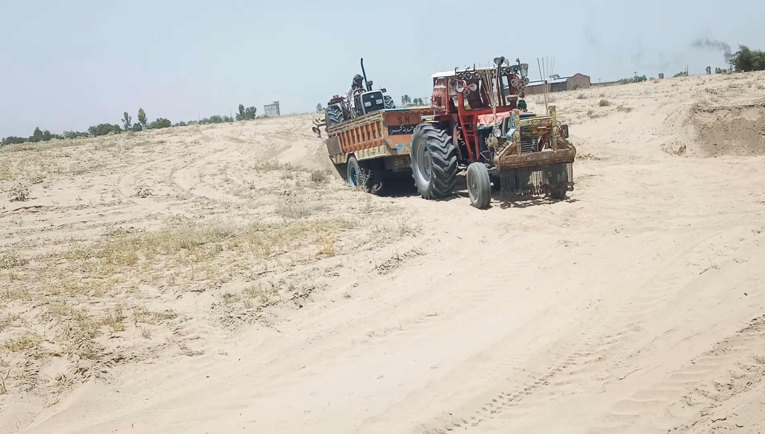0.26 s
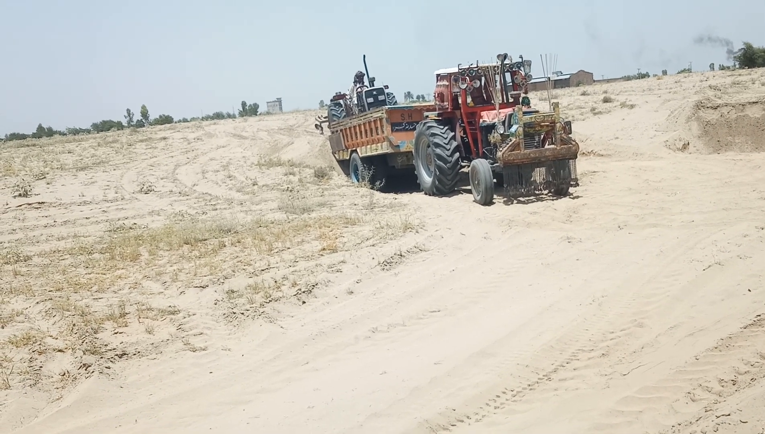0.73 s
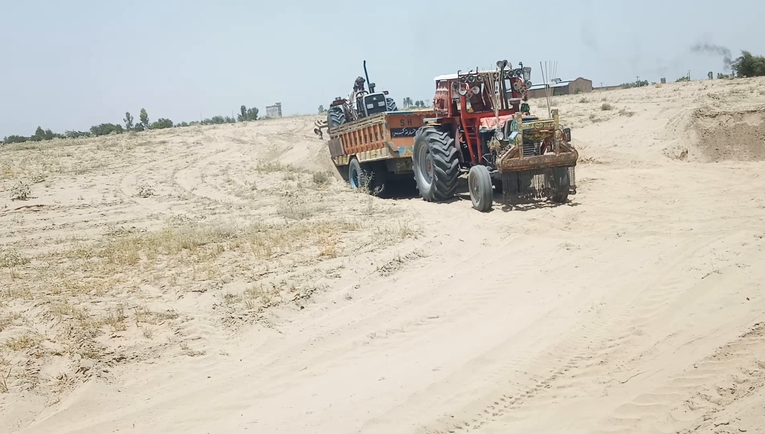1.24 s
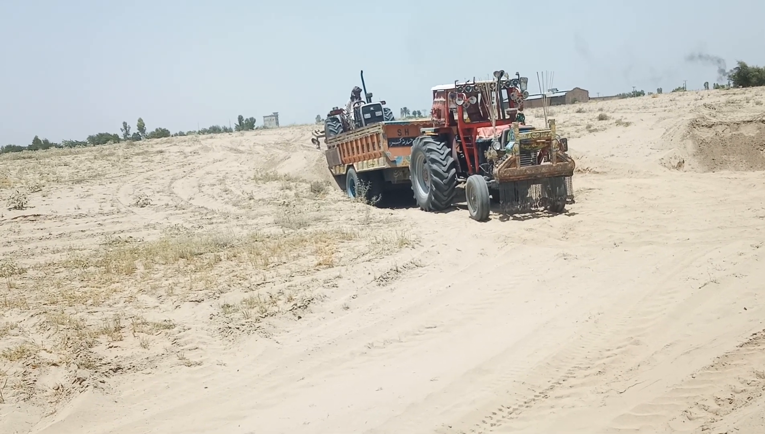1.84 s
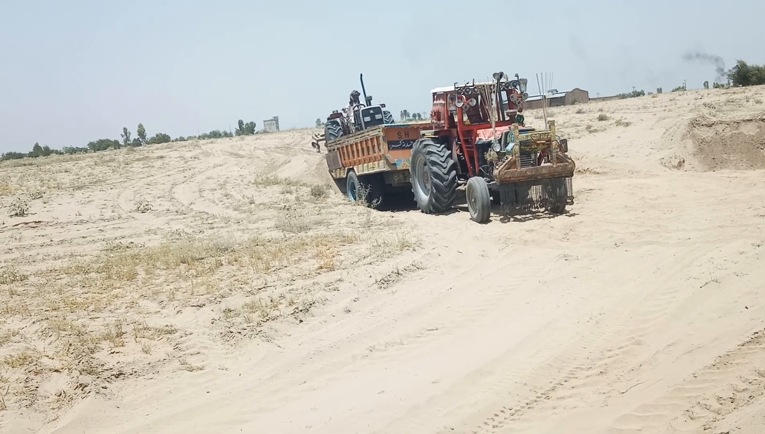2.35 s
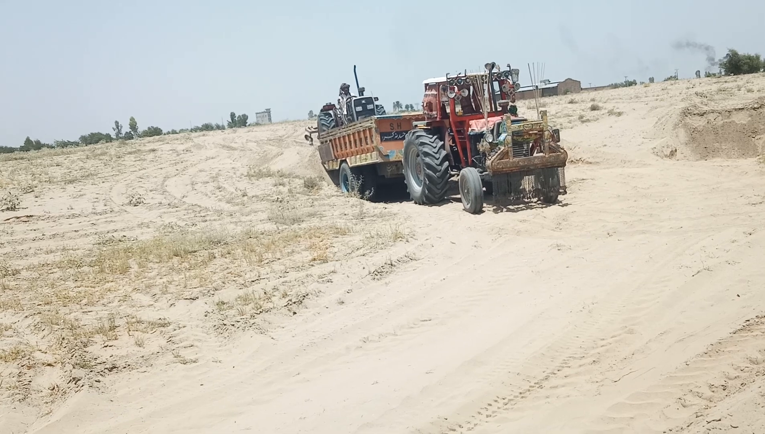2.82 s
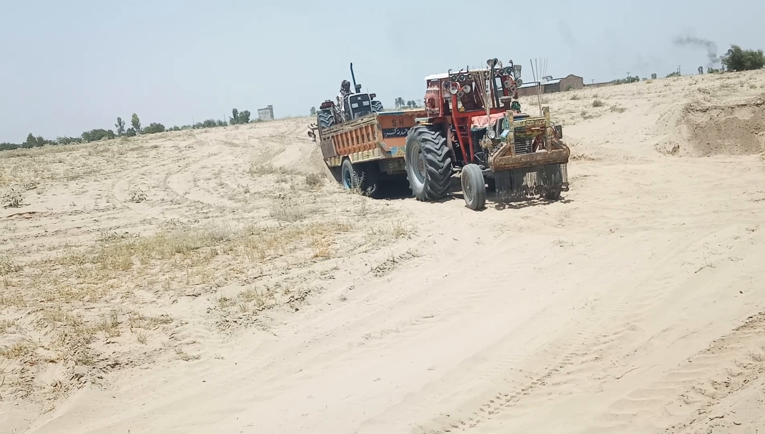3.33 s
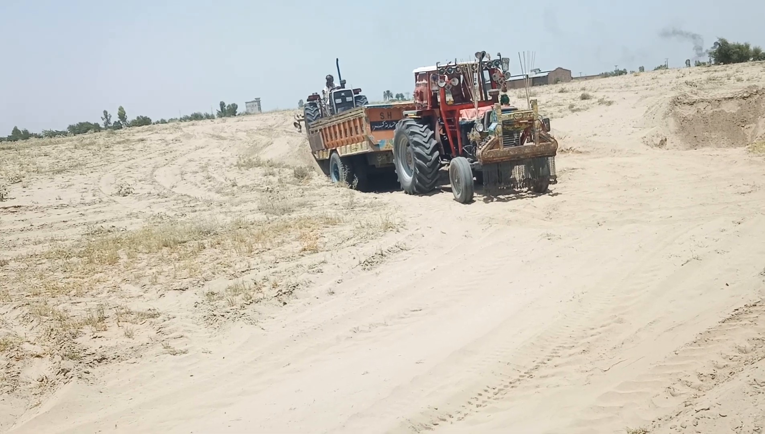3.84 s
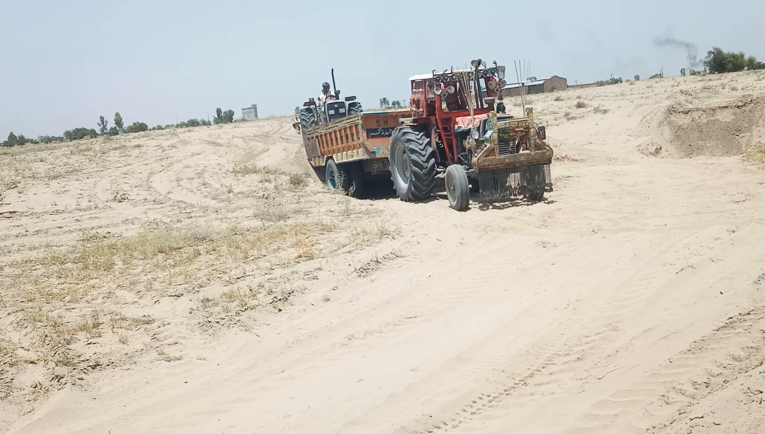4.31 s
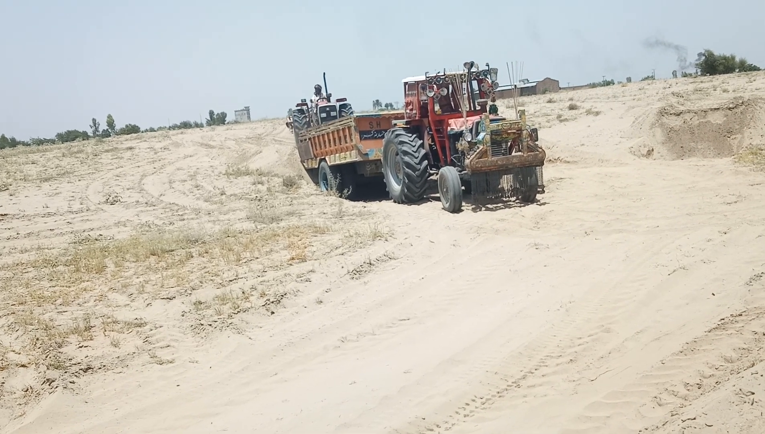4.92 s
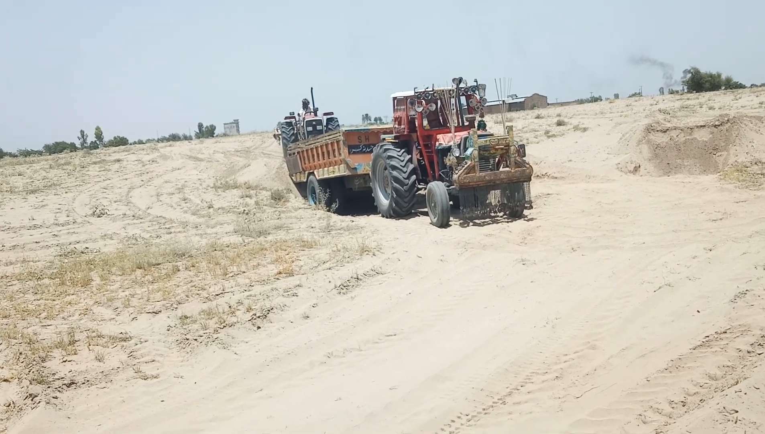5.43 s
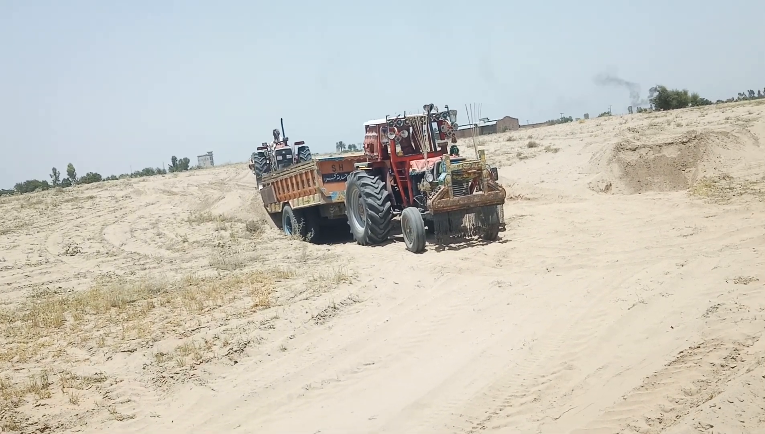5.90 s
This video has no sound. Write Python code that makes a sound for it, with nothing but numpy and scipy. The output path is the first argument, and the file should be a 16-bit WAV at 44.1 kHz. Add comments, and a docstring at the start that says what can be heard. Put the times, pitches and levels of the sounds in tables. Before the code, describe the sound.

Wind rumbles and flaps over an exposed microphone while a tractor engine knocks and chuffs across open ground. Its pulse sags twice under load, with crisp spitting exhaust and brief high chirps, and a single dull knock sounds close by. As the wind fades, the firing quickens into a steady, lighter, slightly uneven diesel clatter that continues to the end.

```python
"""In an open field a diesel tractor drags a loaded trolley through soft sand.
The engine bogs down, works hardest around its slowest moments, then gathers speed. Each firing drives harmonics
of the firing rate (boom) and bursts of filtered noise (knocks, chuffs, spit); short falling tones make chirps.
Wind is shaped noise: a breeze throughout, with gusts and two rushes in little more than the first three seconds.
One dull knock and a faint steady noise complete the scene."""
import sys
import numpy as np
from scipy import signal
from scipy.fft import rfft, irfft, next_fast_len
from scipy.io import wavfile
from scipy.ndimage import uniform_filter1d, map_coordinates

SR = 44100
rng = np.random.default_rng(int(sys.argv[2]) if len(sys.argv) > 2 else 0)


def generate_wav(sig):
    """Save sig (samples, or channels by samples) to the path in sys.argv[1] as 16-bit PCM at SR."""
    pcm = np.round(np.clip(np.atleast_2d(sig).T, -1, 1) * 32767).astype(np.int16)
    wavfile.write(sys.argv[1], SR, pcm)


N = 271656
T = np.arange(N) / SR

# how hard the engine labours: (time [s], effort [0-1])
EFFORT = [(0, 0.3), (.88, 0.42), (1.3, .08), (1.78, 0.4), (1.82, .88), (1.92, 0.56), (1.99, 0.2),
          (2.6, 0.52), (2.97, .5), (3.04, 1), (3.3, 0.81), (3.51, 0.74), (3.72, 0.56), (4.1, 0.31),
          (6.16, 0.31)]


def gain_of(db):
    """Turns decibels into a plain multiplier."""
    return 10 ** (np.asarray(db) / 20)


def evened(x):
    """Scales a signal to an average strength (rms) of 1."""
    return x / np.sqrt(np.mean(x ** 2) + 1e-20)


def curve(rows):
    """Joins (time, value) points by straight lines, one value per sample."""
    return np.interp(T, *np.transpose(rows))


def noise(points):
    """Random noise at rms 1 whose strength at each pitch follows the points."""
    hz, db = np.transpose(points)
    size = next_fast_len(N + 4096)
    f = np.fft.rfftfreq(size, 1 / SR)
    level_db = np.interp(np.log(f + 1), np.log(hz), db)
    spectrum = rfft(rng.standard_normal(N), size) * gain_of(level_db)
    return evened(irfft(spectrum, size)[:N])


def drift(rate):
    """Smooth random wandering at rms 1, with about `rate` new values a second."""
    knots = rng.standard_normal(4096)
    coarse_time = T[::32]
    wander = map_coordinates(knots, [coarse_time * rate], mode="wrap")
    return evened(np.interp(T, coarse_time, wander))


def add(mix, s, sound):
    """Lays a sound into the mix, starting s seconds in."""
    part = mix[max(round(s * SR), 0):][:len(sound)]
    part += sound[:len(part)]


def envelope(rows, attack, sag_db, release):
    """Gain of events (start, length, dB) that rise, sag steadily and die away after their length."""
    power = np.full(N, 1e-12)
    for s, length, db in rows:
        t = np.arange(0, length + 8 * release, 1 / SR)
        shape = np.minimum(t / attack, 1) * np.exp(-np.maximum(t - length, 0) / release)
        add(power, s, (gain_of(db + sag_db * t) * shape) ** 2)
    return np.sqrt(power)


def floor_noise():
    """A faint, steady noise under everything."""
    # colour of the noise: (frequency [Hz], relative level per hertz [dB])
    floor_colour = [(20, 1.5), (5000, 6.5), (7000, 2.5), (9000, -2), (15500, -3.5)]
    return gain_of(-73.5) * noise(floor_colour)


def breeze():
    """Soft low wind noise that swells and fades, with a random waver."""
    # strength of the breeze before its waver: (time [s], level [dB])
    breeze_level = [(0, -43), (.22, -44.5), (.45, -39), (1.9, -29), (2.8, -36), (3.3, -41), (3.7, -53.5),
                    (6.16, -62)]
    # colour of the breeze: (frequency [Hz], relative level per hertz [dB])
    soft_colour = [(15, -27), (35, -28.5), (55, -18), (80, 4), (125, 3.5), (200, -1), (320, -11.5),
                   (550, -27), (1200, -63), (4000, -110)]
    return gain_of(curve(breeze_level) + 3 * drift(25)) * noise(soft_colour)


def eddies(points, steady):
    """Turbulent noise whose slow swells are partly evened out, by the share `steady`."""
    x = noise(points)
    local_power = abs(uniform_filter1d(x ** 2, size=900)) + 1e-6  # averaged over about 20 ms
    return evened(x / local_power ** (steady / 2))


def gusts(corner_hz=560, full_db=-21, brighten=0.78, flutter_db=1.5, lumps_db=1.24):
    """Lumpy gusts buffet the microphone: the harder the gust, the higher its rumble reaches."""
    # gusts before their lumps: (start [s], length [s], deep level [dB], upper level relative to deep [dB])
    gust_rows = [(0, 0.023, -28.5, -15), (0.769, .04, -25, -6), (0.813, 0.097, -19, -7.5),
                 (0.916, 0.11, -16.5, -2), (1.09, 0.033, -16, -0.5), (1.142, 0.074, -19.5, 0),
                 (1.257, 0.072, -23.5, -8.5), (1.353, 0.054, -17.5, -6), (1.42, 0.051, -22.5, 3.5),
                 (1.516, .045, -17, 2), (1.571, 0.057, -18.5, -4), (1.632, 0.047, -17.5, 1.5),
                 (1.732, 0.028, -18.5, -4), (1.778, 0.065, -17.5, 1.5), (1.847, 0.16, -22.5, 3),
                 (2.013, 0.064, -26, -10), (2.09, 0.023, -18.5, -3.5), (2.221, .12, -20.5, -11),
                 (2.49, 0.067, -22, -7.5), (2.584, 0.036, -25, -13.5), (2.693, .11, -25, -8.5),
                 (2.897, .025, -33, -13), (3.021, .02, -30, -23), (3.115, 0.031, -32.5, -8),
                 (3.188, 0.031, -26.5, -10)]
    # colour of the deep part: (frequency [Hz], relative level per hertz [dB])
    deep_colour = [(15, -35.5), (30, -32), (50, -42.5), (75, -6.5), (105, 2.5), (210, 1), (280, -8),
                   (400, -20.5), (900, -67), (3000, -115)]
    # colour of the upper part: (frequency [Hz], relative level per hertz [dB])
    upper_colour = [(100, -33), (220, -0.5), (290, 2), (440, -4), (550, -9.5), (700, -17), (1000, -30.5),
                    (1400, -42), (3000, -67), (6500, -100)]
    attack_s, sag_db_per_s, release_s = .011, -22.5, 0.015
    shape = attack_s, sag_db_per_s, release_s
    deep_rows = [(s, length, db) for s, length, db, _ in gust_rows]
    upper_rows = [(s, length, db + upper_db) for s, length, db, upper_db in gust_rows]
    lumps = gain_of(lumps_db * drift(60))
    deep = lumps * envelope(deep_rows, *shape)
    upper = lumps * envelope(upper_rows, *shape)
    turbulence = eddies(upper_colour, steady=0.45) * gain_of(flutter_db * drift(130))
    dull = signal.sosfiltfilt(signal.butter(2, corner_hz, fs=SR, output="sos"), turbulence)
    # a stronger gust keeps more of the sound above the corner
    strength_db = 20 * np.log10(upper) - full_db
    reach = gain_of(brighten * np.clip(strength_db, -24, 4))
    return deep * eddies(deep_colour, steady=0.093) + upper * (dull + reach * (turbulence - dull))


def rushes():
    """Air rushes straight across the microphone, as short bursts of turbulent noise."""
    # rushes of air: (start [s], length [s], level [dB])
    rush_rows = [(.296, 0.032, -31), (.348, 0.049, -23)]
    # colour of the rushes: (frequency [Hz], relative level per hertz [dB])
    rush_colour = [(40, -25), (110, 8), (280, 10.5), (500, 0.5), (800, 3.5), (1050, -6), (1300, -3.5),
                   (2000, -11), (2600, -13.5), (3500, -5.5), (4200, -20), (4800, -49), (9000, -73)]
    attack_s, sag_db_per_s, release_s = 0.013, -4, 0.057
    return envelope(rush_rows, attack_s, sag_db_per_s, release_s) * eddies(rush_colour, steady=0.2)


def knocks():
    """A dull blow with no ring: noise that rises at once and dies within milliseconds."""
    # short knock close by: (time [s], level [dB], decay time [s])
    knock_rows = [(2.905, -30.5, 0.0025)]
    # colour of the knock: (frequency [Hz], relative level per hertz [dB])
    knock_colour = [(80, -8), (250, 10), (750, -2), (1200, -24), (4200, -12), (4900, -58)]
    out, t = np.zeros(N), np.arange(2000) / SR
    for s, db, decay in knock_rows:
        shape = np.e * t / decay * np.exp(-t / decay)  # peaks at 1
        add(out, s, gain_of(db) * evened(noise(knock_colour)[:len(t)]) * shape)
    return out


def firings(scatter_db=0.36, start_phase=-.53):
    """Engine speed adds up to a running count of firings; also the time [s] and strength [dB] of each."""
    # engine speed: (time [s], firings per second [1/s])
    speed = [(0.0, 25.65), (0.29, 28.01), (0.71, 28.19), (1.08, 29.6), (1.65, 21.35), (1.81, 21.52),
             (2.0, 25.2), (2.16, 24.52), (2.45, 28.46), (2.66, 23.61), (2.91, 21.94), (3.19, 23.99),
             (3.53, 30.42), (3.93, 34.32), (4.96, 32.81), (5.35, 33.89), (6.16, 34.21)]
    # strength of the four cylinders in firing order, before scaling with speed: (level [dB])
    cylinder_db = [-2, -2, 2.7, -3.5]
    # firings that bark out above their neighbours: (time [s], extra level [dB])
    barks = [(.81, 5), (1.865, 2), (1.91, 3.5), (2.23, 6.5), (3.44, 2.5), (3.47, 1.5), (3.51, 1), (4.35, 3),
             (4.47, 4.5), (5.075, 2.5)]
    rate = curve(speed)
    turns = start_phase + np.cumsum(rate) / SR
    number = np.arange(int(turns[-1]) + 1)
    times = np.interp(number, turns, T)
    # the cylinders differ more once the engine runs free
    uneven = np.interp(np.interp(times, T, rate), [29, 33], [.3, 1])
    scatter = scatter_db * rng.standard_normal(400)[:len(times)]
    db = np.take(cylinder_db, number, mode="wrap") * uneven + scatter
    for s, extra_db in barks:
        db[np.argmin(abs(times - s))] += extra_db
    return turns, times, db


def chirp(db, hz, length, fall=0.048, count=12):
    """A short rough whistle that falls through hz as pressure drains; a negative fall makes it rise."""
    u = np.linspace(-.5, .5, int(length * SR))
    knots = np.linspace(-.5, .5, count)
    a, b = (.35 * np.interp(u, knots, w) for w in rng.standard_normal((2, count)))  # roughness
    phase = 2 * np.pi * np.cumsum(hz * (1 - fall * u)) / SR
    tone = evened((1 + a) * np.sin(phase) + b * np.cos(phase))
    return gain_of(db) * np.cos(np.pi * u) ** 2 * tone


def hard_chirps():
    """Hard firings chirp loudly in the pipe."""
    # chirps: (middle [s], level [dB], pitch [Hz])
    chirp_rows = [(2.645, -35.5, 3990), (2.692, -35, 4030), (2.817, -33.5, 4200), (2.956, -34.5, 4250),
                  (2.997, -34.5, 4290), (3.086, -37, 4170), (3.130, -34, 4200), (3.441, -38, 4130),
                  (4.468, -36, 4190), (4.71, -36, 4220), (4.949, -40, 4300), (5.072, -35.5, 4230)]
    out = np.zeros(N)
    for s, db, hz in chirp_rows:
        add(out, s - .0075, chirp(db, hz, length=.015))
    return out


def faint_chirps(times, firing_db, faint_db=-53, effort_db=12, faint_hz=4130, effort_hz=220, from_s=1.8):
    """After from_s every firing chirps faintly, louder and higher with effort, and louder with its strength."""
    out = np.zeros(N)
    effort = np.interp(times, *np.transpose(EFFORT))
    level_db = faint_db + firing_db + effort_db * effort
    pitch_hz = faint_hz + effort_hz * effort
    chance = rng.standard_normal((400, 3))  # for level, pitch and timing
    for s, db, hz, (a, b, c) in zip(times, level_db, pitch_hz, chance):
        if s > from_s:
            add(out, s - .008 + .0015 * c, chirp(db + 2.5 * a, hz + 70 * b, length=.012))
    return out


def rising_whistles():
    """Thin whistles that slide upward, each one a long chirp turned to rise."""
    # whistles: (start [s], length [s], start pitch [Hz], end pitch [Hz], level [dB])
    whistle_rows = [(0.114, 0.2, 3960, 4430, -55), (0.451, 0.11, 4130, 4530, -54.5)]
    out = np.zeros(N)
    for s, length, start_hz, end_hz, db in whistle_rows:
        middle_hz = (start_hz + end_hz) / 2
        fall = (start_hz - end_hz) / middle_hz
        add(out, s, chirp(db, middle_hz, length, fall=fall, count=30))
    return out


def puffs(times, db, lead, rise, decay):
    """Power envelope of mean 1: a valve opens at each firing and the pressure bleeds away."""
    t, power = np.arange(3000) / SR, np.zeros(N)
    shape = (1 - np.exp(-(t / rise) ** 2)) * np.exp(-t / decay)
    for s, size in zip(times, gain_of(db)):
        add(power, s - lead, size ** 2 * shape)
    return power / power.mean()


def valve_knock(times, db):
    """Power of valves and injectors knocking at each firing and, more weakly, between firings."""
    between = (times[1:] + times[:-1]) / 2
    chance_db = 4.5 * rng.standard_normal((2, 400))
    main_db = db / 2 + 0.6 * chance_db[0, :len(times)]
    main = puffs(times, main_db, lead=.0055, rise=0.007, decay=0.0066)
    weak = puffs(between, chance_db[1, :len(between)], lead=.003, rise=0.0011, decay=0.012)
    return 0.69 * main + 0.054 * weak


def boom(turns, waver_db=2.12, jitter_turns=.02):
    """Low harmonics of the firing rate; uneven burns make them flutter, the upper ones most."""
    # exhaust boom before the flutter: (multiple of the firing rate [1], relative level [dB])
    orders = [(1, -32.5), (2, -3.5), (3, -2), (4, -8), (5, -13), (6, -17), (7, -12.5), (8, -13.5), (9, -15)]
    turns = turns + jitter_turns * drift(16)
    total = np.zeros(N)
    for k, db in orders:
        level = gain_of(db + waver_db * np.sqrt(k) * drift(22))
        total += level * np.cos(2 * np.pi * (round(k) * turns + rng.random()))
    return evened(total)


def rumble(knock):
    """Low noise of the pipe that partly pulses with the knock."""
    # colour of the rumble: (frequency [Hz], relative level per hertz [dB])
    rumble_colour = [(20, -17), (45, -11.5), (70, -4), (120, 2), (190, 4), (300, 2.5), (370, -5),
                     (450, -43.5), (700, -45.5)]
    return gain_of(-5) * noise(rumble_colour) * np.sqrt(.5 + .5 * knock)


def clatter(loud_db, effort, share, knock):
    """Knock of the engine block: noise that pulses with the knock, louder with effort."""
    # colour of the clatter: (frequency [Hz], relative level per hertz [dB])
    clatter_colour = [(300, -27), (450, -14), (580, 0.5), (770, 1.5), (1000, -5.5), (1130, -10), (1330, 0),
                      (1580, 2.5), (1840, -5.5), (1980, 1), (2260, -13), (2700, -10.5), (4300, -24),
                      (4800, -52)]
    level_db = loud_db - .5 + 3 * effort
    knock_share = np.clip(0.25 + .45 * share, 0, 1)
    pulse = np.sqrt(1 - knock_share + knock_share * knock)
    return gain_of(level_db + 0.91 * drift(350)) * noise(clatter_colour) * pulse


def hiss(loud_db, effort, share, chuff):
    """Gas hisses from the pipe; more effort makes it louder and packs it into chuffs, with swells on top."""
    # colour of the hiss: (frequency [Hz], relative level per hertz [dB])
    hiss_colour = [(400, -32), (700, -1.5), (1950, -10.5), (2250, -12), (2430, -1), (3030, -2.5),
                   (3150, -1.5), (3480, 5.5), (3880, -0.5), (4000, 2), (4320, -9.5), (4480, -13.5),
                   (4750, -33), (5400, -39), (9000, -52.5)]
    # swells of hiss over the engine: (start [s], length [s], level [dB])
    swell_rows = [(.06, 0.071, -39.5), (.8, 0.09, -44), (.95, .13, -34.5), (1.39, 0.13, -47)]
    attack_s, sag_db_per_s, release_s = .04, -19.5, 0.13
    level_db = loud_db - 4 + 7.5 * effort
    chuffing = gain_of(level_db) * np.sqrt(1 - share + share * chuff)
    swells = envelope(swell_rows, attack_s, sag_db_per_s, release_s)
    return gain_of(1.9 * drift(300)) * noise(hiss_colour) * np.hypot(chuffing, swells)


def spit(times, db, effort):
    """Sharp high noise that bursts at each firing and grows strongly with effort."""
    # colour of the spit: (frequency [Hz], relative level per hertz [dB])
    spit_colour = [(3500, -17.5), (4500, 9), (4850, 0), (5300, -15.5), (5900, -10.5), (6300, 5), (6620, -9),
                   (6950, -0.5), (7280, -9.5), (7550, -10), (8500, -15), (11000, -21.5), (15000, -21.5)]
    level_db = -86 + 29 * effort
    crack = puffs(times, 1.2 * db, lead=.0095, rise=.005, decay=.0045)
    return gain_of(level_db + 1.8 * drift(960)) * noise(spit_colour) * np.sqrt(crack)


def scattered(x, echo_db=-16, count=5):
    """Ground, bonnet and trolley add early echoes whose paths shift as the tractor rocks."""
    out = x.copy()
    for delay in rng.uniform(.002, .008, count):
        sign = rng.choice([-1, 1])
        arrival = T - delay - .0004 * drift(4)
        out += gain_of(echo_db) * sign * np.interp(arrival, T, x)
    return out * np.std(x) / np.std(out)


def ringing(x):
    """Narrow resonances of sheet metal and pipe lift the sound that drives them."""
    # resonances: (frequency [Hz], width [Hz], lift [dB])
    rings = [(283, 6.8, 3), (566, 12, 0.5), (739, 33, 4.5), (912, 34, 5.5), (989, 18, 5), (1060, 16, 2.5),
             (1288, 16, 4.5), (1674, 29, 5), (2880, 65, 7), (3000, 23, 6.5), (3376, 34, 3.5), (3380, 19, 3),
             (3800, 14, 1)]
    out = x.copy()
    for hz, width, db in rings:
        out += (gain_of(db) - 1) * signal.lfilter(*signal.iirpeak(hz, hz / width, fs=SR), x)
    return out


def engine(turns, times, db):
    """Boom and rumble of the pipe, knock of the block and chuffs of gas at each firing; effort sharpens them."""
    # loudness that clatter and hiss follow: (time [s], level [dB])
    loudness = [(0, -47.5), (.3, -44), (.68, -47), (1.05, -40), (1.3, -47), (1.72, -49.5), (1.85, -42.5),
                (2.25, -43.5), (2.6, -44), (2.9, -44), (3.2, -44), (3.5, -44.5), (4.1, -46), (4.35, -44.5),
                (4.78, -47), (5.0, -45.5), (5.4, -46.5), (6.16, -45)]
    # strength of the exhaust boom: (time [s], level [dB])
    boom_level = [(0, -46), (2, -41.5), (3.3, -46.5), (4.7, -50), (5.3, -47.5), (6.16, -46)]
    effort, loud_db = curve(EFFORT), curve(loudness)
    share = np.clip(0.11 + 1.0 * effort, 0, .95)  # part of the hiss that comes in chuffs
    chuff = puffs(times, db, lead=.007, rise=.006, decay=.0055)
    knock = valve_knock(times, db)
    low = gain_of(curve(boom_level)) * (boom(turns) + rumble(knock))
    block = clatter(loud_db, effort, share, knock)
    gas = hiss(loud_db, effort, share, chuff)
    return ringing(low + scattered(block + gas)) + spit(times, db, effort)


def scene():
    """Adds up all the sounds, from the background to the engine."""
    turns, times, db = firings()
    wind = breeze() + gusts() + rushes()
    whistling = hard_chirps() + faint_chirps(times, db) + rising_whistles()
    mix = floor_noise() + wind + knocks() + whistling + engine(turns, times, db)
    return mix[None]


def record(dry):
    """The recorder's band limit: a steep filter removes what lies above 15500 Hz."""
    band_limit = signal.firwin(511, 15500, window=("kaiser", 9), fs=SR)
    return signal.oaconvolve(dry, band_limit[None], "same")


dry = scene()
out = record(dry)
generate_wav(out)
```